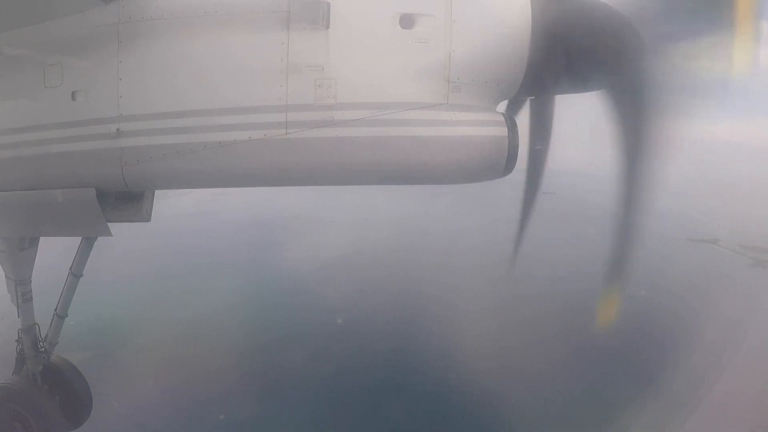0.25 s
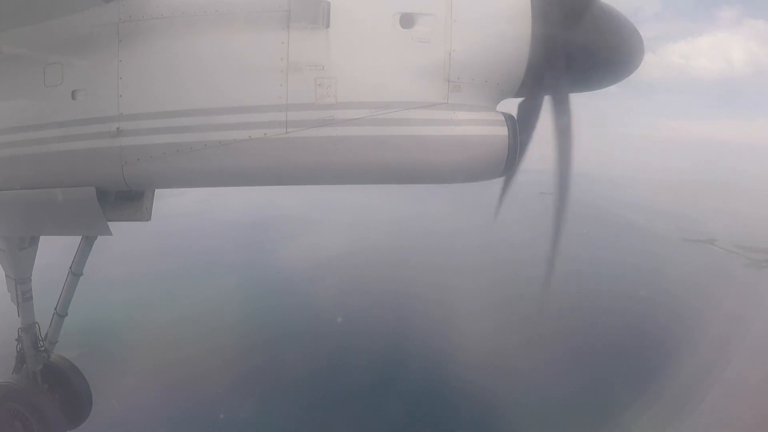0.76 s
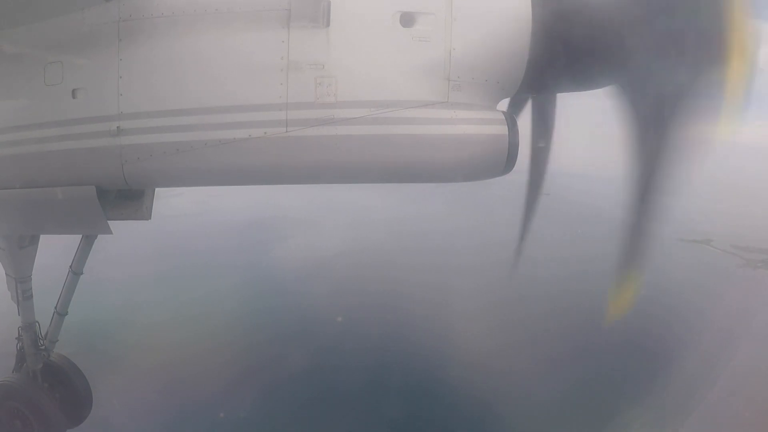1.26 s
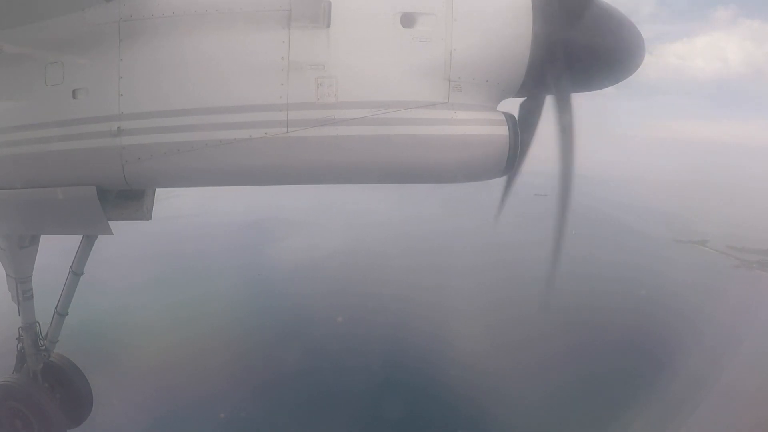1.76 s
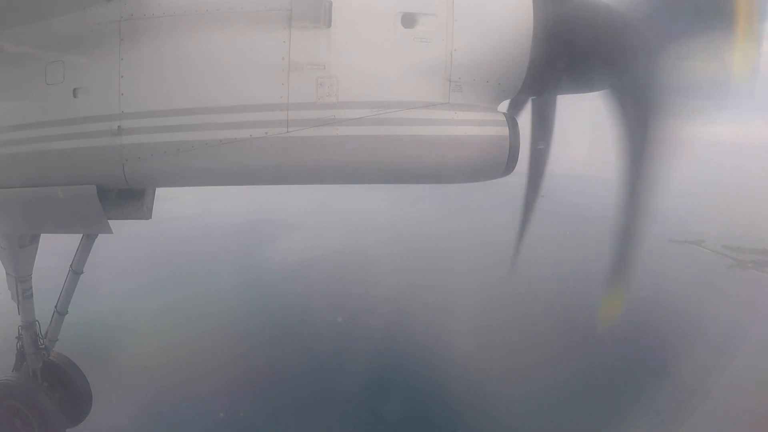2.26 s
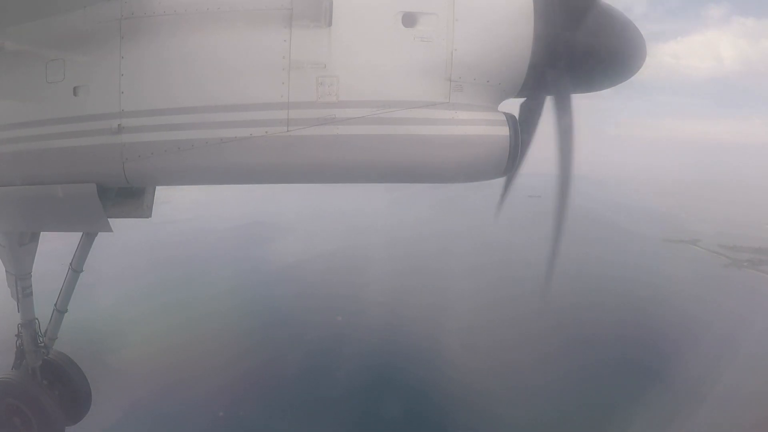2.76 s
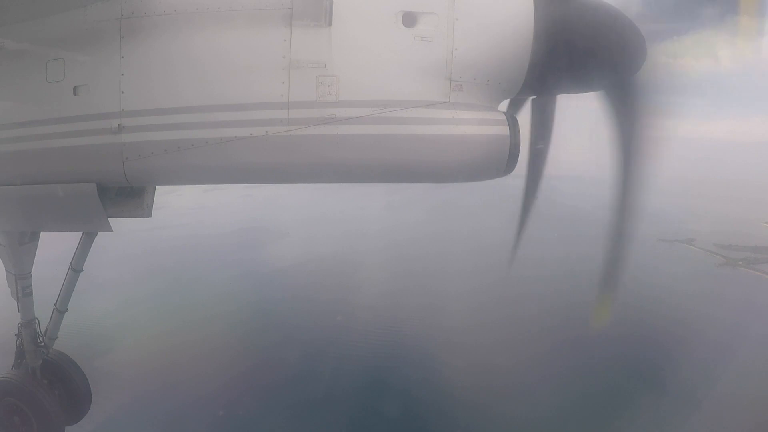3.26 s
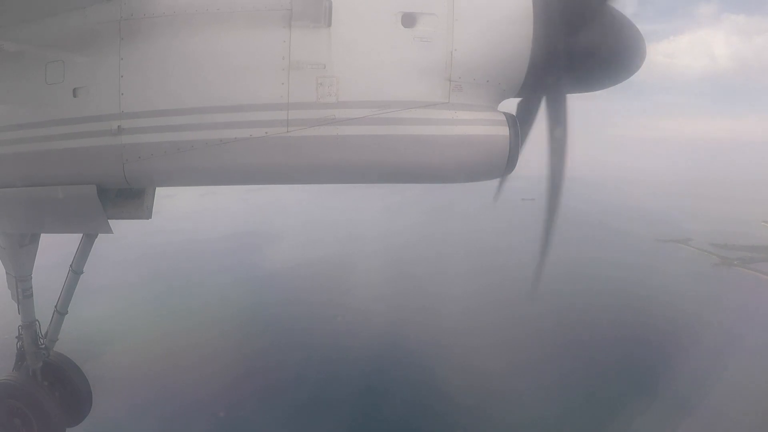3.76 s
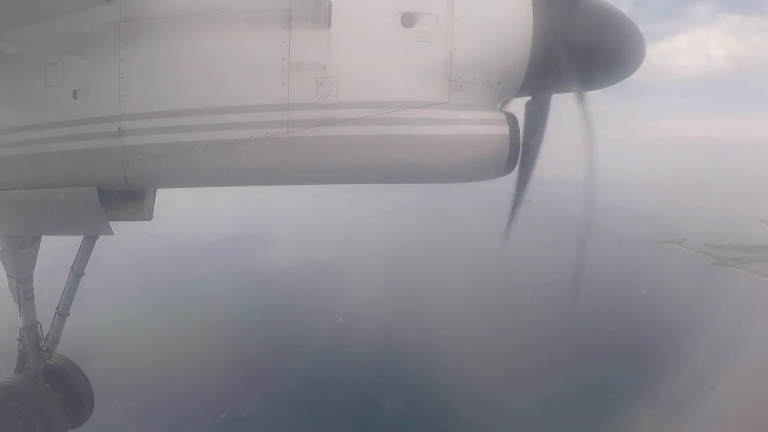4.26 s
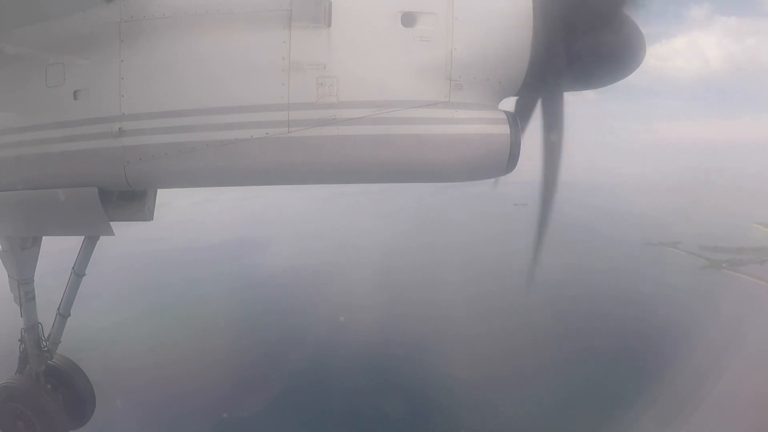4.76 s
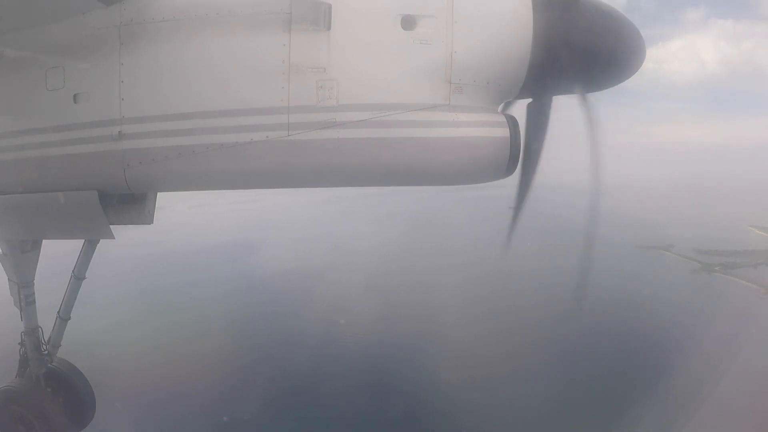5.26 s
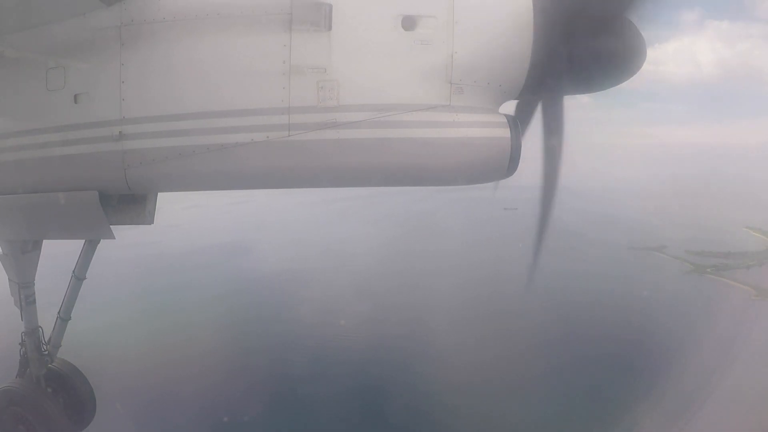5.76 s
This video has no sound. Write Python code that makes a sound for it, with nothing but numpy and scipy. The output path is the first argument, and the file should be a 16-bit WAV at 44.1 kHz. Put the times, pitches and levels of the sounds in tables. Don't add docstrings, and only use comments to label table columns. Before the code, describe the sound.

Loud, boomy low drone of a turboprop airliner heard from a window seat, with gusty bass throbbing, muffled air roar and faint high whine.

```python
import sys
import numpy as np
from scipy import signal
from scipy.fft import rfft, irfft, next_fast_len
from scipy.io import wavfile
from scipy.ndimage import uniform_filter1d, minimum_filter1d

SR = 44100
rng = np.random.default_rng(int(sys.argv[2]) if len(sys.argv) > 2 else 0)


def magnitude_from_level(level_db):
    exponent = np.asarray(level_db, float) / 20
    return 10 ** exponent


def generate_wav(signal):
    frames = np.transpose(np.atleast_2d(signal))
    scaled = np.clip(frames, -1, 1) * 32767
    pcm = np.round(scaled).astype(np.int16)
    wavfile.write(sys.argv[1], SR, pcm)


N = 265041

BLADE_HZ = 85
USUAL_ROAR_DB = -36.5
# freq_hz, density_db [dB per Hz]
HISS_SPECTRUM = [(2000, -26.5), (2500, -7.5), (2800, -1.5), (3250, -6.5), (3950, -6), (4720, -2.5),
                 (5100, -3.5), (5870, 0), (6710, -5), (7290, -12), (8850, -12.5), (11400, -21.5),
                 (13800, -21.5), (15200, -33)]


def columns(table):
    s, *rest = np.transpose(table)
    return [np.interp(np.arange(N) / SR, s, c) for c in rest]


def shaped(gain_at):
    size = next_fast_len(N)
    hz = np.arange(size // 2 + 1) * SR / size + 1e-3
    x = irfft(rfft(rng.standard_normal(size)) * gain_at(hz), size)[:N]
    return x / x.std()


def walk(rate_hz):
    return shaped(lambda hz: np.exp(-(hz / rate_hz) ** 2))


def tone(hz):
    cycles = np.cumsum(hz) / SR + rng.random()
    return np.sqrt(2) * np.sin(2 * np.pi * cycles)


def ring(modes):
    return sum(magnitude_from_level(db) * shaped(lambda f: 1 / (1 + (2 * (f - c) / w) ** 2)) for c, w, db in modes)


def colour(spectrum, hz):
    # centre_hz, width_hz, lift_db
    panels = [(707, 12, -1), (746, 87, 3.5), (1003, 90, 3), (1100, 30, -0.5), (1340, 18, 5.5),
              (1442, 44, 7.5), (3616, 190, 6), (4360, 70, 5), (4610, 60, 3.5), (4820, 90, 5), (5280, 60, 3),
              (8650, 120, 1.5), (13050, 640, 4)]
    f, db = np.transpose(spectrum)
    lift_db = sum(lift / (1 + (2 * (hz - c) / w) ** 2) for c, w, lift in panels)
    spectrum_db = np.interp(np.log(hz), np.log(f), db, left=-120, right=-120)
    return magnitude_from_level(spectrum_db + lift_db)


def propeller():
    # time_s, level_db
    prop_beat = [(0.0, -36), (0.15, -17.5), (1.05, -19.5), (1.67, -22), (2.19, -15.5), (2.59, -20),
                 (2.75, -14), (3.31, -20), (3.71, -13.5), (3.8, -22.5), (4.18, -20.5), (4.28, -24.5),
                 (4.7, -16), (5.04, -26.5), (5.2, -15.5), (6.01, -18)]
    # multiple, level_db
    blade_orders = [(1, 1.5), (2, -22), (3, -31)]
    (level_db,) = columns(prop_beat)
    blade_hz = BLADE_HZ + 0.36 * walk(rate_hz=1.42)
    flutter_db = 0.9 * walk(rate_hz=6.8)
    harmonics = sum(magnitude_from_level(db) * tone(k * blade_hz) for k, db in blade_orders)
    return magnitude_from_level(level_db + flutter_db) * harmonics


def hums(roar_db):
    hum_pitches = [502.6, 803.6, 5482, 5662, 5747, 5832]
    # wander_hz, level_db [over roar]
    hum_rows = [(1.199, -15.5), (.8, -10), (3, -38), (2.999, -34), (3, -42), (3.5, -45)]
    skin_db = USUAL_ROAR_DB + 0.6 * (roar_db - USUAL_ROAR_DB)
    out = 0
    for hz, (wander_hz, db) in zip(hum_pitches, hum_rows):
        flutter_db = 1.6 * walk(rate_hz=2.8)
        out = out + magnitude_from_level(skin_db + db + flutter_db) * tone(hz + wander_hz * walk(rate_hz=3))
    return out


def compressors():
    # time_s, near_db, far_db
    whistle = [
        (0, -75, -79),
        (.9, -75, -75.5),
        (2.0, -75.5, -76),
        (2.6, -80, -82),
        (3.7, -84, -82.5),
        (4.7, -80, -85.5),
        (5.5, -83.5, -77),
        (6.01, -87, -77),
    ]
    near_hz, far_hz = 13000, 12826
    out = 0
    for hz, level_db in zip((near_hz, far_hz), columns(whistle)):
        drift_hz = hz + 9 * walk(rate_hz=1.2)
        chopped = tone(drift_hz) + 0.9 * tone(drift_hz + BLADE_HZ) + 0.3 * tone(drift_hz + 2 * BLADE_HZ)
        out = out + magnitude_from_level(level_db - 7.0 + 3.5 * walk(rate_hz=25)) * chopped
    return out


def gusted_mode(gusts, flutter_db, wander_hz):
    rise_s, fall_s = 0.054, 0.074
    t = np.arange(N) / SR
    power = 0
    for s, _, db in gusts:
        swell = np.exp(-0.5 * ((t - s) / np.where(t < s, rise_s, fall_s)) ** 2)
        power = power + (magnitude_from_level(db) * swell) ** 2
    hz = columns(gusts)[0] + wander_hz * walk(rate_hz=8.5)
    return np.sqrt(power) * magnitude_from_level(flutter_db * walk(rate_hz=4.3)) * tone(hz)


def booms():
    # time_s, pitch_hz, peak_db
    gust_rows = [(0.05, 99.5, -14.5), (0.3, 110.5, -12.7), (0.68, 107.5, -14.9), (0.76, 113.5, -14.6),
                 (1.02, 103.0, -17.2), (1.29, 114.0, -12.1), (1.68, 113.0, -14.8), (1.8, 99.5, -16.4),
                 (1.87, 111.5, -14.3), (1.99, 106.0, -15.6), (2.18, 111.5, -13.9), (2.4, 112.5, -12.7),
                 (2.7, 108.0, -13.7), (2.91, 113.5, -13.6), (3.1, 110.5, -14.8), (3.19, 102.5, -14.3),
                 (3.34, 110.0, -11.5), (3.54, 108.0, -15.7), (3.8, 98.0, -11.7), (3.96, 110.0, -12.4),
                 (4.3, 93.0, -17.0), (4.42, 95.0, -16.5), (4.5, 109.5, -8.6), (4.74, 108.0, -13.8),
                 (4.92, 106.5, -13.4), (5.12, 105.5, -17.2), (5.55, 112.5, -13.1), (5.72, 103.0, -15.1),
                 (5.81, 94.5, -13.9), (5.91, 108.0, -14.0)]
    # centre_hz, width_hz, level_db
    boom_rest = [(110.2, 7.2, -27), (98.3, 12, -24.5)]
    split_hz = 104
    upper = gusted_mode([g for g in gust_rows if g[1] > split_hz], flutter_db=1.86, wander_hz=1.24)
    lower = gusted_mode([g for g in gust_rows if g[1] <= split_hz], flutter_db=5.5, wander_hz=1.3)
    return upper + lower + ring(boom_rest)


def cabin(shake_db):
    # centre_hz, width_hz, level_db
    air_modes = [(40.2, 8.6, -26.5), (52, 48, -28), (73.7, 12, -19)]
    # centre_hz, width_hz, share_db
    floor_modes = [(125.3, 16, 0), (142.46, 7.4, -5.5), (166.7, 14, -11.5)]
    # freq_hz, density_db [dB per Hz]
    rumble_spectrum = [(8.8, -46), (15, -14), (32, -13.5), (81, -1.5), (102, 9.5), (127, -7), (199, -18.5),
                       (330, -35.5), (430, -61.5), (730, -120)]
    rumble = magnitude_from_level(-20.5) * shaped(lambda f: colour(rumble_spectrum, f))
    return booms() + ring(air_modes) + magnitude_from_level(shake_db) * ring(floor_modes) + rumble


def airflow(roar_db):
    # freq_hz, density_db [dB per Hz]
    roar_spectrum = [(110, -36.5), (180, -1.5), (295, -12.5), (454, -19), (507, -19.5), (682, -22.5),
                     (796, -20.5), (878, -22), (1010, -16), (1140, -24.5), (1430, -27), (1540, -28.5),
                     (2170, -31.5), (2500, -37.5), (3250, -69), (5500, -120)]
    hiss_db = roar_db - 17
    roar_gain = magnitude_from_level(roar_db + 4.5 + 0.57 * walk(rate_hz=9.6))
    hiss_gain = magnitude_from_level(hiss_db + 0.38 + 0.27 * walk(rate_hz=10))
    roar = roar_gain * shaped(lambda f: colour(roar_spectrum, f))
    hiss = hiss_gain * shaped(lambda f: colour(HISS_SPECTRUM, f))
    return roar + hiss


def strap():
    # peak_s, peak_db, length_s
    rustles = [
        (3.506, -54, .006),
        (3.716, -57, .004),
        (3.8, -57, .009),
        (3.168, -60, .004),
    ]
    t = np.arange(N) / SR
    bursts = sum(magnitude_from_level(db) * np.exp(-((t - s) / length_s) ** 2) for s, db, length_s in rustles)
    grain = magnitude_from_level(5.1 * walk(rate_hz=300))
    return bursts * grain * shaped(lambda f: colour(HISS_SPECTRUM, f) * (f / 6000) ** 0.8)


def scene():
    # time_s, roar_db
    air_swell = [(0, -35.5), (.6, -33.5), (1.15, -32.5), (1.47, -33), (1.95, -32), (2.6, -37.5),
                 (3.4, -37.5), (4.1, -38), (4.36, -36), (4.7, -39), (5.42, -36), (6.01, -36.5)]
    (roar_db,) = columns(air_swell)
    shake_db = -22 + 0.6 * (roar_db - USUAL_ROAR_DB) + 1.0 * walk(rate_hz=1.3)
    engines = propeller() + hums(roar_db) + compressors()
    return (engines + cabin(shake_db) + airflow(roar_db) + strap())[None]


def low_pass(x):
    return signal.sosfilt(signal.butter(12, 15100, fs=SR, output="sos"), x)


def record(dry):
    even_s, even_rms, even_share = 0.072, 0.29, 0.33
    limit, hardness, release_s = 0.67, 5.5, 0.007
    split_hz, treble_share = 280, 0.3
    edge_s, top_hz = 0.006, 14000

    power = uniform_filter1d(dry ** 2, int(even_s * SR), axis=-1)
    evened = (even_rms ** 2 / (power + even_rms ** 2 / 20)) ** (even_share / 2)

    span = int(release_s * SR)
    limiter = (1 + (np.abs(dry) * evened / limit) ** hardness) ** (-1 / hardness)
    limiter = uniform_filter1d(minimum_filter1d(limiter, span, axis=-1), span, axis=-1)
    gain = evened * limiter

    bass = signal.sosfiltfilt(signal.butter(2, split_hz, fs=SR, output="sos"), dry)
    held = bass * gain + (dry - bass) * gain ** treble_share
    held = held * signal.windows.tukey(N, 2 * edge_s * SR / N)

    top_band = signal.sosfiltfilt(signal.butter(12, top_hz, "high", fs=SR, output="sos"), held)
    top_loss = 1 / (1 + np.exp(-6 * (walk(rate_hz=22) + 0.3)))
    return low_pass(held - top_loss * top_band)


dry = scene()
out = record(dry)
generate_wav(out)
```